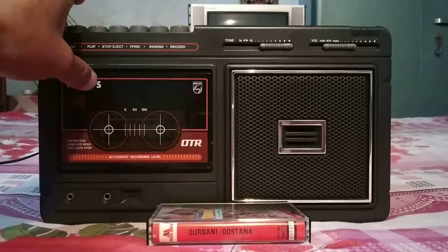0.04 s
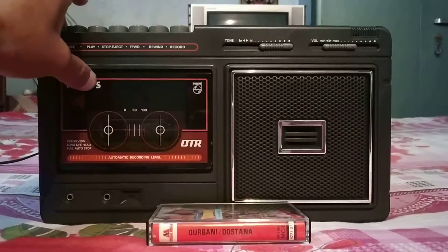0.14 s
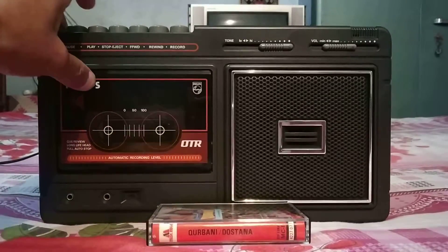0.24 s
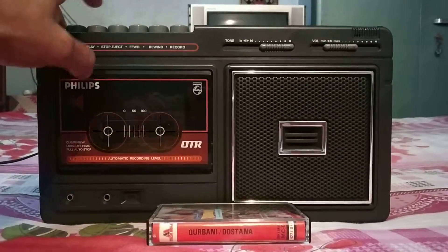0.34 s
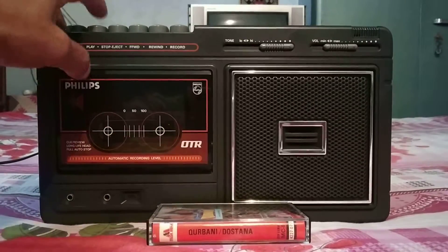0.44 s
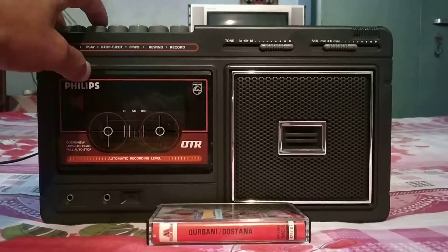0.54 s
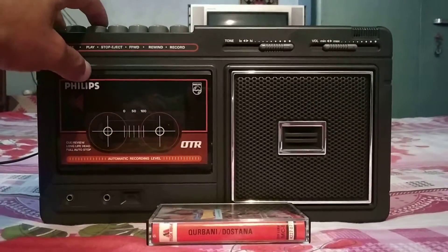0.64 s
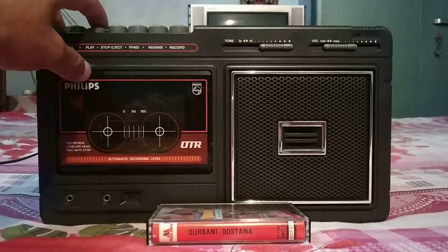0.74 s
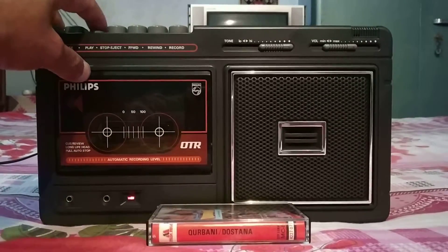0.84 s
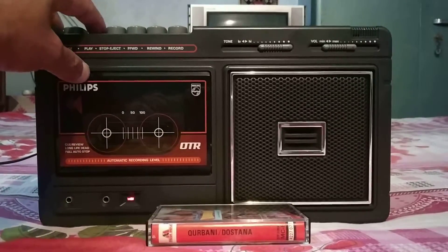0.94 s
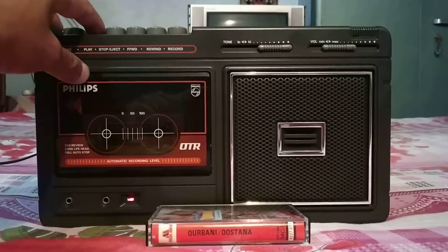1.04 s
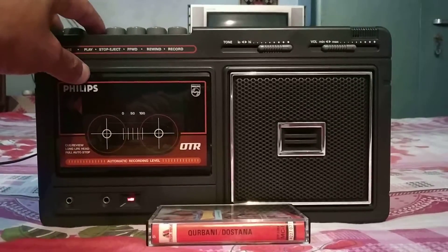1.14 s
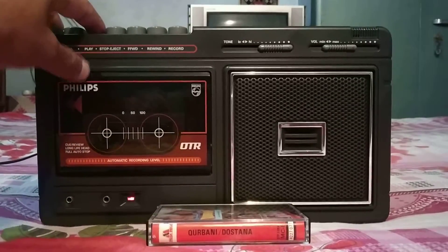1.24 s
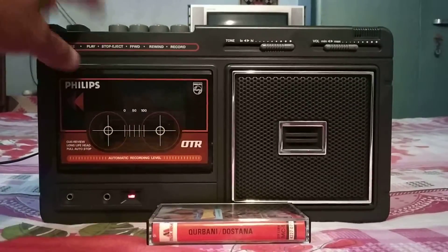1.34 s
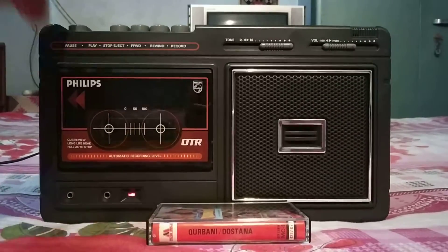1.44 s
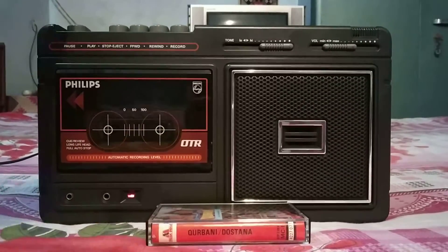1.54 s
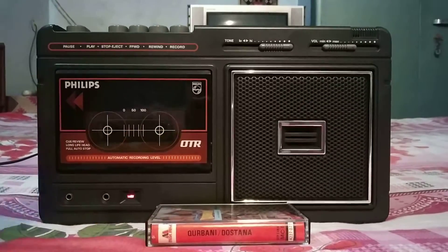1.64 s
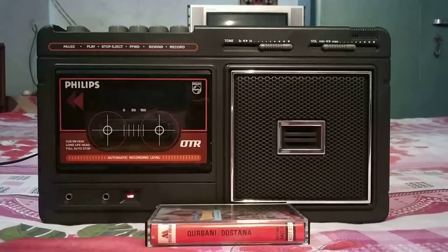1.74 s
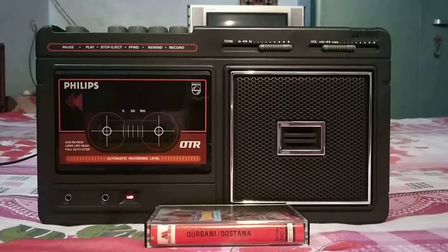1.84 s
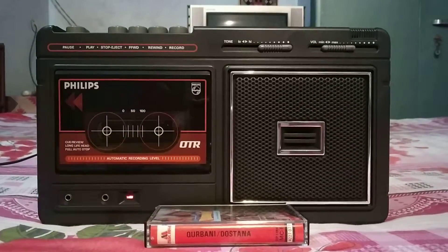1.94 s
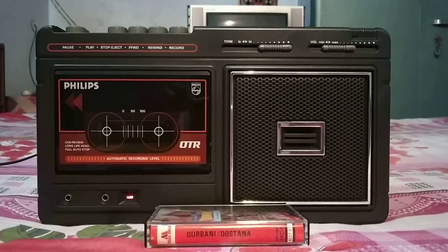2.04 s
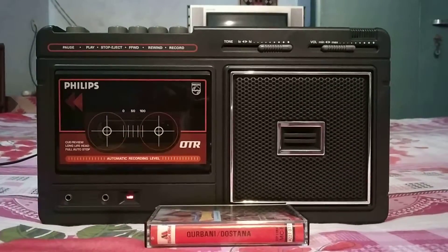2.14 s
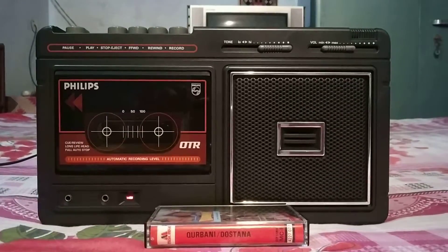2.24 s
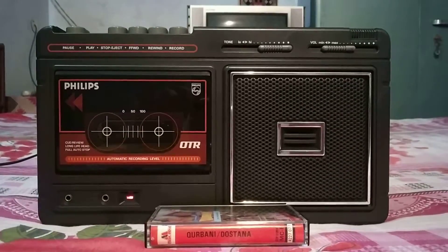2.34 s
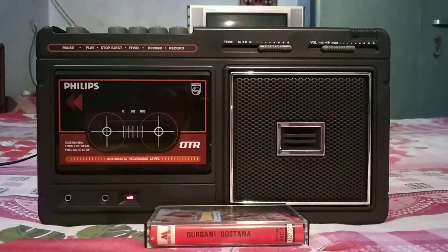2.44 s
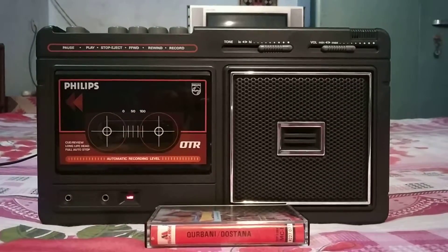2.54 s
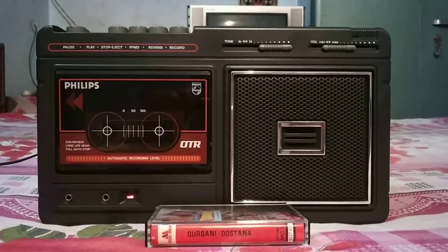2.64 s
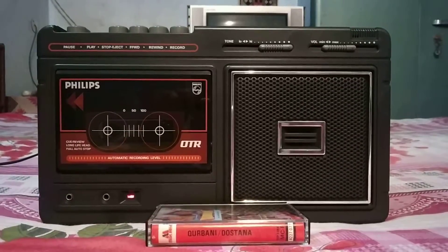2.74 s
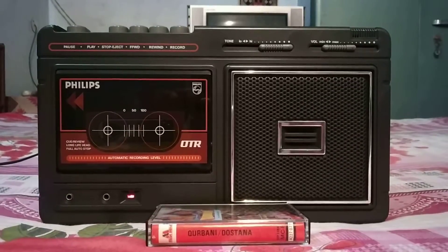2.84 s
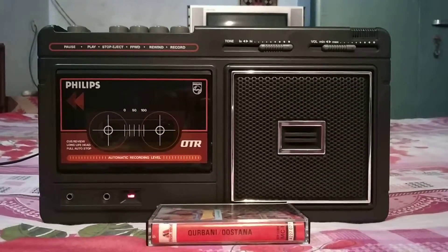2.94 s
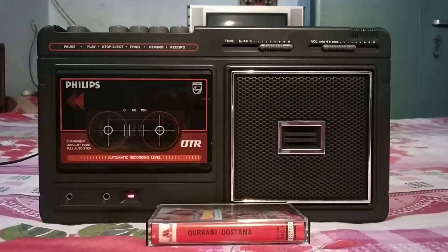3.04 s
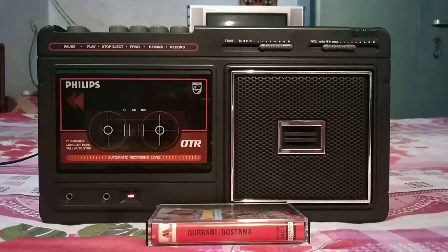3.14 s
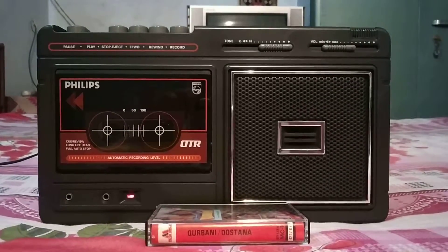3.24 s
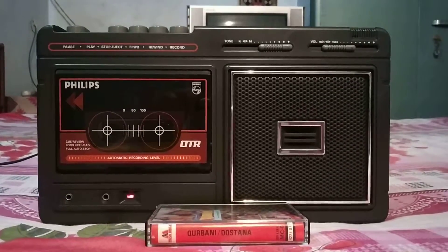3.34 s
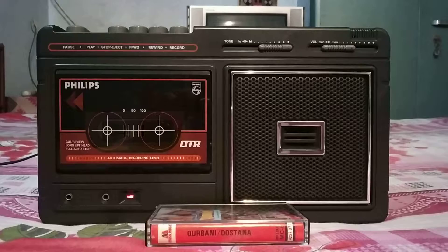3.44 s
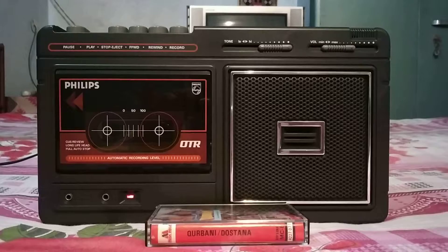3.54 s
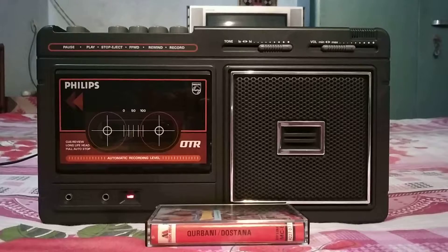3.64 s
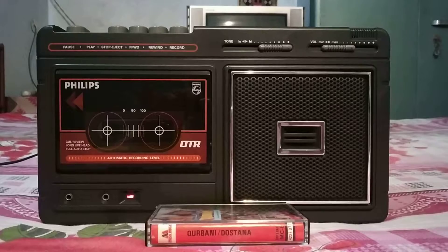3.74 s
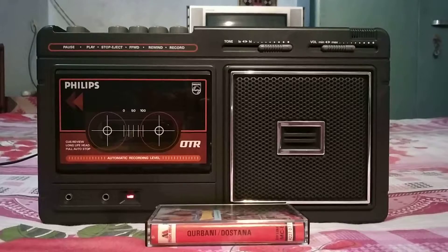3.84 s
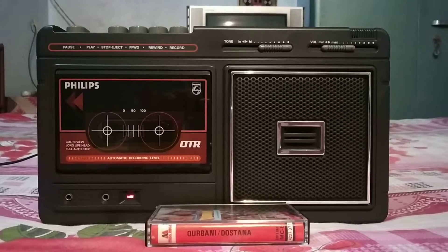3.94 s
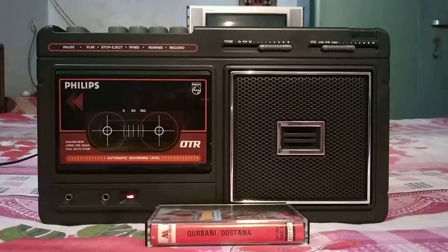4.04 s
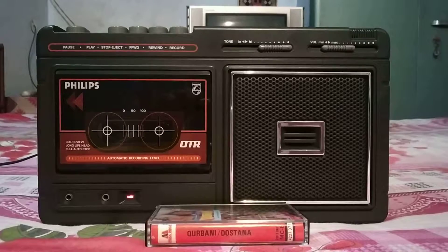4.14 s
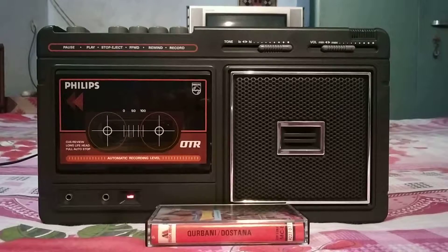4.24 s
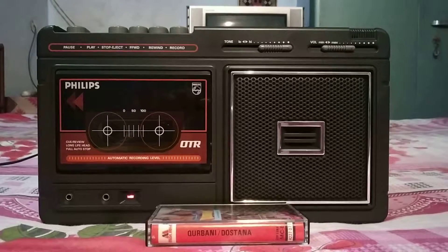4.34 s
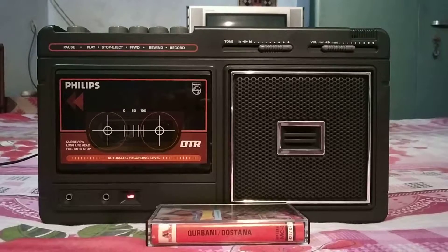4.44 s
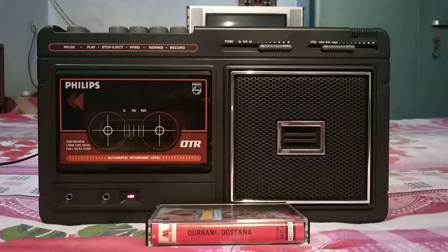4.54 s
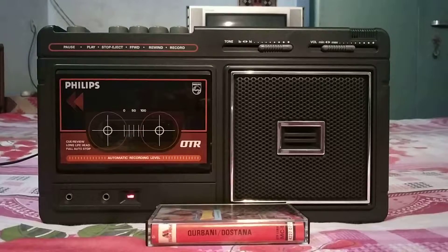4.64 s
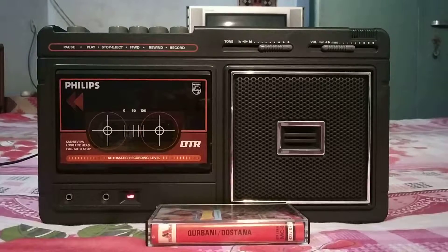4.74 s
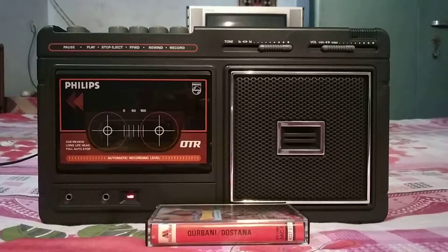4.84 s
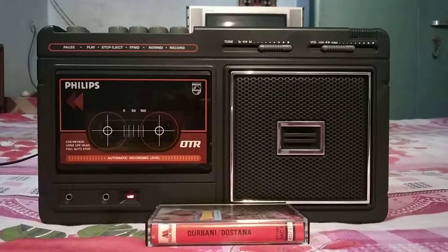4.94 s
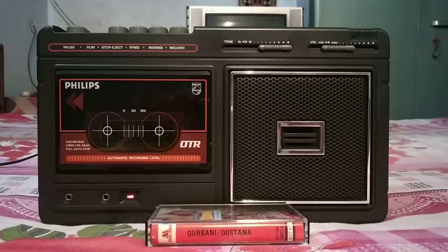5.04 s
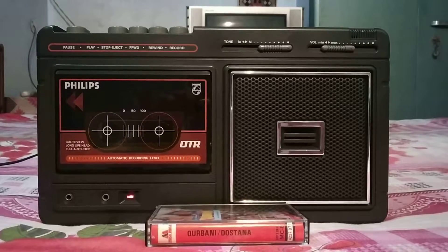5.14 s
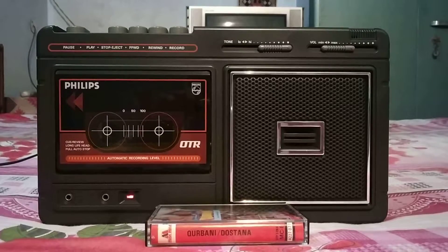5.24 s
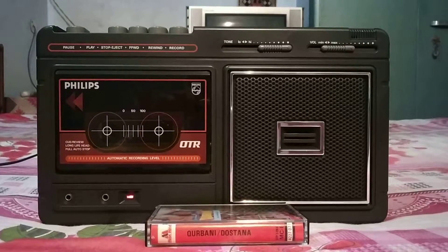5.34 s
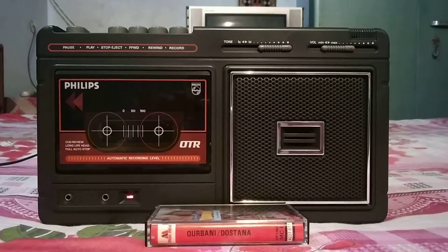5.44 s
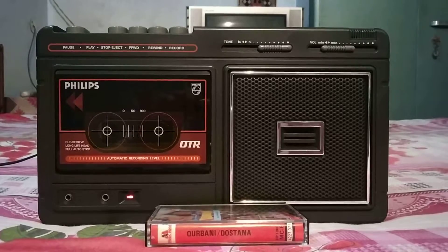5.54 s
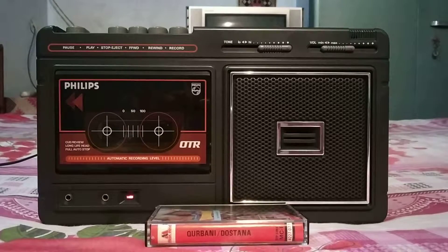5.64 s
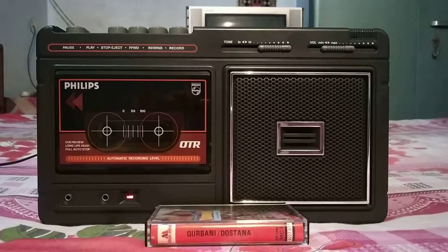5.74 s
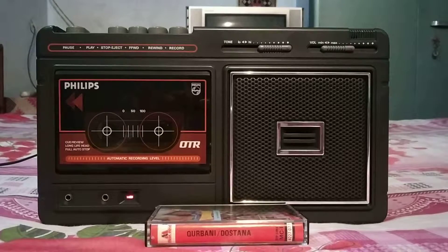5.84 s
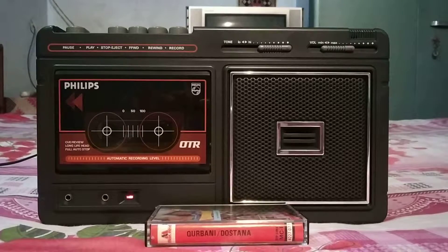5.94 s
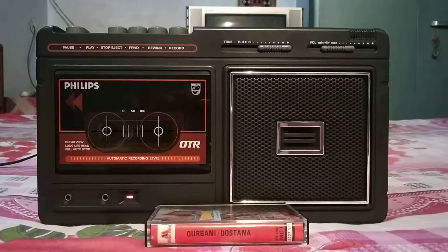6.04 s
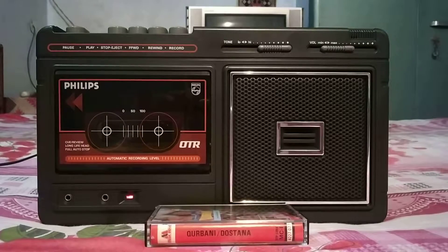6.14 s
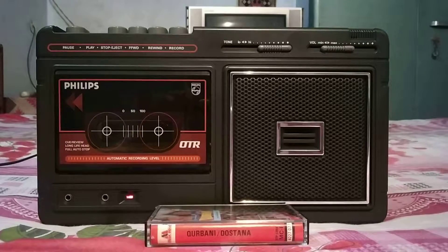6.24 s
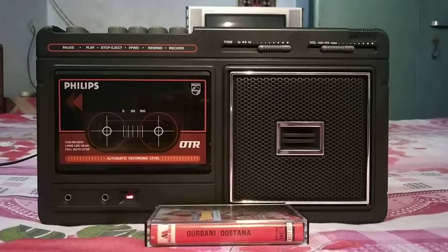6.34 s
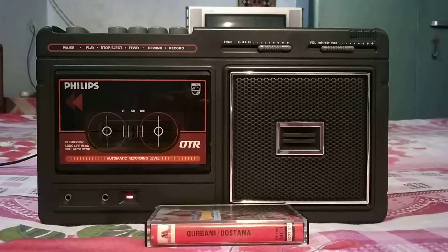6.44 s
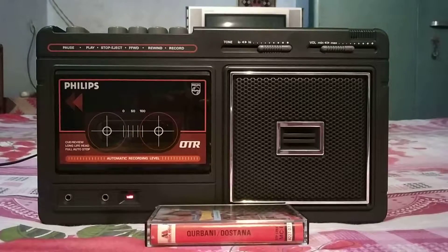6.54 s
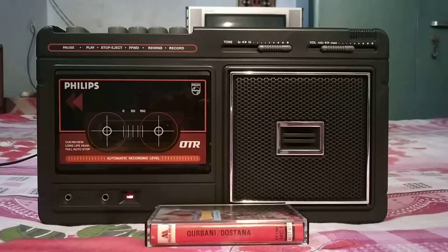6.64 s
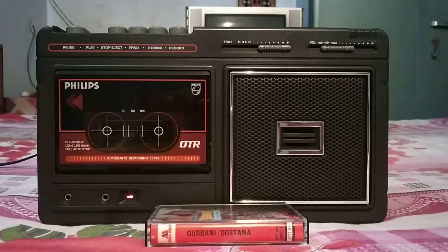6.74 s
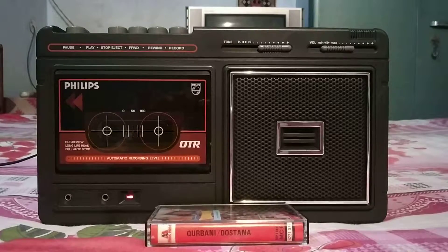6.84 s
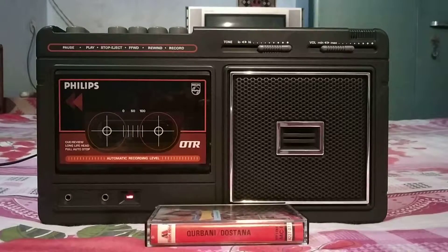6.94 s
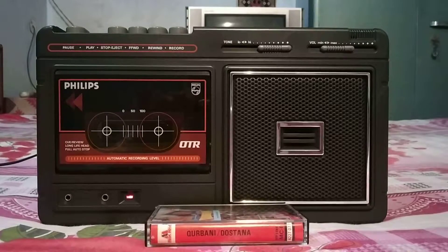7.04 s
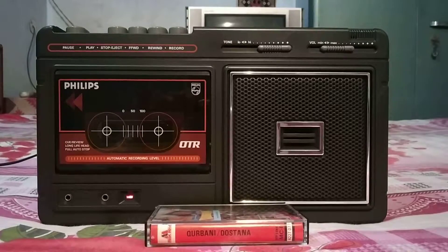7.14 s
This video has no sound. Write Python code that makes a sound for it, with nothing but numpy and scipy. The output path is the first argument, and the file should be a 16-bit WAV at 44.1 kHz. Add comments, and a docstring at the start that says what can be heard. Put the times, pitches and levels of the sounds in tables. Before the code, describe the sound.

A tape machine is clacked shut and its key snapped down; a small motor runs on quietly with hum, a cloth rustle, tiny crackles and high whine.

```python
"""Tape player in a small room

A hand works the door and keys of a plastic tape player close to a microphone with two ports.
Clicks and pushes ring cabinet modes and small latch parts; the motor starts and runs on as tones and noise.
The tail of an earlier click dies away; nearby cloth swishes and crackles as shaped noise.
An appliance hums, faint tones swell and fade, under room noise and microphone hiss; a far clock ticks softly.
A mains-fed whine of two rippled tones comes on briefly, then again to the end."""
import sys
import numpy as np
from scipy import signal
from scipy.fft import rfft, irfft
from scipy.io import wavfile

SR = 44100
rng = np.random.default_rng(int(sys.argv[2]) if len(sys.argv) > 2 else 0)


def voltage_ratio(level):
    """Linear amplitude factor for a level in decibels (scalar or array-like)."""
    return 10 ** (np.asarray(level, float) / 20)


def output_pcm(signal):
    """Save a mono or channel-first signal as 16-bit PCM at the path in sys.argv[1].

    Samples are clipped to [-1, 1] before scaling.
    """
    pcm = np.clip(np.atleast_2d(signal).T, -1, 1) * 32767
    wavfile.write(sys.argv[1], SR, np.round(pcm).astype(np.int16))


N = 317079
BODY_LAG = 5   # samples by which the left port hears the hum and the cabinet later


def rms_one(x):
    """Scale to rms 1."""
    return x / np.sqrt(np.mean(x ** 2) + 1e-20)


def at_hz(points, hz):
    """Read a spectrum table on a log frequency axis."""
    points = np.array(points)
    return np.interp(np.log(hz), np.log(points[:, 0]), points[:, 1])


def drift(rate):
    """Slow random wandering of spread 1; a higher rate wanders faster."""
    r = np.exp(-128 * np.pi * rate / SR)   # computed on every 64th sample
    white = rng.standard_normal(N // 64 + 2002)
    slow = signal.lfilter([1], [1, -2 * r, r * r], white)[2000:]
    return np.interp(np.arange(N) / 64, np.arange(len(slow)), slow / slow.std())


def band(x, low_hz, high_hz, order=1):
    """Butterworth band-pass."""
    edges = np.clip([low_hz, high_hz], 20, 0.45 * SR)
    return signal.sosfilt(signal.butter(order, edges, "band", fs=SR, output="sos"), x)


def pan(x, db, lag=0):
    """Level split of db, left over right; the left port hears it lag samples later."""
    return np.array([np.roll(x, lag) * voltage_ratio(db / 2), x * voltage_ratio(-db / 2)])


def held(start_s, db, held_s, fall_db_per_s, rise_db_per_s):
    """Gain that rises to a level, holds it and fades, straight in dB."""
    since = np.arange(N) / SR - start_s
    rise = rise_db_per_s * np.minimum(since, 0)
    fall = fall_db_per_s * np.maximum(since - held_s, 0)
    return voltage_ratio(db + rise - fall)


# how alike diffuse noise is at the two ports: (frequency [Hz], likeness [0 to 1])
PORT_LIKENESS = [(60, 0.86), (150, 0.76), (380, 0.91), (950, 0.057), (2380, 0.058), (5980, 0.15),
                 (15000, 0.055)]


def coloured(white, spectrum):
    """Stereo noise of rms 1, alike at the ports in the bass and nearly unrelated in the treble."""
    length = white.shape[1]
    hz = np.maximum(np.fft.rfftfreq(length, 1 / SR), 1)
    alike = np.clip(at_hz(PORT_LIKENESS, hz), 0, 1)
    mid, side = rfft(white) * voltage_ratio(at_hz(spectrum, hz))
    ports = np.sqrt(1 + alike) * mid + np.sqrt(1 - alike) * side * [[1], [-1]]
    return rms_one(irfft(ports, length))


def burst(centre_hz, length_ms, alike=0.43):
    """A dying noise, about three octaves wide, partly its own at each port; its shared part peaks at 1."""
    t = np.arange(2000) / SR
    dying = rng.standard_normal((2, len(t))) * np.exp(-t * 1000 / length_ms)
    mid, side = band(dying, centre_hz / 4.0, centre_hz * 2.1)
    return (mid + (1 - alike) * side * [[1], [-1]]) / np.abs(mid).max()


# tones of the humming appliance: (frequency [Hz], relative level [dB], spread of its swelling [dB])
HUM_TONES = [(195.2, -58.5, 0.5), (314.3, -64, 2.5), (336.4, -47.5, 0.57), (347.6, -69.5, 8),
             (397.4, -77.5, 8.5), (470, -71, 5), (1373, -78, 0), (1477, -76, 1)]
# spectrum of room noise and microphone hiss: (frequency [Hz], relative density [dB per Hz])
AIR_SPECTRUM = [(30, -28), (60, 9), (120, -3), (200, 2.5), (300, -8), (450, -13), (650, -16), (1000, -24.5),
                (2000, -23.5), (3200, -30.5), (5500, -25), (8000, -31), (12500, -27.5), (15500, -28)]


def background():
    """The main hum tone is nearly steady; some faint ones swell and fade strongly, over room noise and hiss."""
    t = np.arange(N) / SR
    tones = np.zeros(N)
    for hz, db, swell_db in HUM_TONES:
        level = np.sqrt(2) * voltage_ratio(db + swell_db * drift(5.5))
        tones += level * np.sin(2 * np.pi * hz * t + 0.18 * swell_db * drift(3.6))
    air = voltage_ratio(-48 + 0.32 * drift(21.0)) * coloured(rng.standard_normal((2, N)), AIR_SPECTRUM)
    return pan(tones, 2.2, lag=BODY_LAG) + air * voltage_ratio([[1.3], [-1.3]])


# noise swells: the dying tail of an earlier click, then a stroke of cloth:
# (full from [s], relative level [dB], held [s], fading [dB per s])
NOISE_SWELLS = [(0.0, -41.5, 0.0027, 249), (2.056, -41, 0.18, 28)]
# spectrum of both swells: (frequency [Hz], relative density [dB per Hz])
SWELL_SPECTRUM = [(180, -4), (300, -2.5), (337, -32), (366, -13.5), (404, -10.5), (446, -12), (835, -16),
                  (1180, -17.5), (1810, -22), (3600, -26.5), (5500, -21.5), (8500, -25), (15500, -25.5)]
# a hollow note sliding down inside the swish: (time [s], frequency [Hz], relative level [dB])
HOLLOW_SLIDE = [(2.03, 500, -70), (2.05, 478, -48), (2.08, 444, -60), (2.11, 397, -44), (2.145, 318.7, -56),
                (2.185, 255, -37), (2.22, 201, -34), (2.26, 176, -40), (2.33, 126.4, -70)]


def tail_and_swish(grain_db=1.5, rise_db_per_s=420):
    """A click's tail dies away; later cloth catches in dense uneven grains as a hollow note slides down."""
    grains = rng.standard_normal((2, N)) * voltage_ratio(grain_db * rng.exponential(1, N))
    swells = sum(held(*swell, rise_db_per_s) for swell in NOISE_SWELLS)
    noise = swells * voltage_ratio(1.13 * drift(20)) * coloured(grains, SWELL_SPECTRUM)
    t = np.arange(N) / SR
    s, hz, db = np.transpose(HOLLOW_SLIDE)
    pitch = np.interp(t, s, hz) * (1 + 0.0292 * drift(35.6))
    level = voltage_ratio(np.interp(t, s, db, left=-np.inf, right=-np.inf) + 2.3 * drift(35))
    note = np.sqrt(2) * level * np.sin(2 * np.pi * np.cumsum(pitch) / SR)
    return noise * voltage_ratio([[-3.0], [3.0]]) + pan(note, -5.6)


# hard contacts of door, latch and keys:
# (time [s], relative level [dB], nominal centre [Hz], decay constant before filtering [ms])
HARD_CLICKS = [(0.2439, -31, 8000, 2.4), (0.257, -22.5, 7400, 4.3), (0.3223, -32.5, 5200, 0.58),
               (0.690, -42.5, 2000, 11), (0.7808, -35, 4870, 1.7), (0.7907, -40, 4000, 1.3),
               (0.8759, -24.5, 5530, 1.6), (0.885, -37, 5000, 5.8), (0.9828, -46.5, 5970, 30),
               (1.0067, -30, 5950, 2.4), (1.0108, -9.5, 8960, 9), (1.0138, -12, 6000, 4.3),
               (1.2345, -30, 6100, 4.8), (1.2408, -32.5, 4000, 3.5)]
# soft pushes on the cabinet: (time [s], relative level [dB], tilt over the modes [dB per octave])
SOFT_KNOCKS = [(0.2446, -35, -8), (0.257, -28.5, 4), (.2640, -21.5, 6), (0.691, -34, 1),
               (0.7893, -13.5, -7), (1.0138, -24.5, 21.5), (1.0190, -33.5, -9), (1.2356, -33, 2),
               (1.2413, -27.5, 5.5), (1.2480, -29, 6)]
# ringing modes of the cabinet: (frequency [Hz], relative level [dB], t60 [s])
CABINET_MODES = [(233.6, -13, 0.23), (255, -17, 0.097), (329, -1.5, 0.02), (448, -11, 0.16),
                 (500, -10.5, 0.14), (712, -24.5, 0.061), (956, -10, 0.0083), (1280, -25, 0.031),
                 (1564, -28, 0.025), (1650, -40, 0.049)]
# the whole front flexes once: (frequency [Hz], relative level [dB], t60 [s])
FRONT_FLEX = (530, 0.0, 0.015)
# small hard parts of latch and keys, rung by every click: (frequency [Hz], relative level [dB], t60 [s])
LATCH_PARTS = [(1300, -30.5, .012), (4540, -47, .012), (4760, -44, 0.0058), (5200, -40, .012),
               (5600, -30.5, 0.011), (7400, -49, 0.0099), (8550, -32, 0.017), (9120, -26, .01),
               (10930, -25, 0.0047), (13900, -24, 0.0054)]


def player(knock_ms=0.48, bare_db=-1.0, side_db=3.5):
    """Hard clicks sound in the air and rattle the cabinet; soft pushes set it ringing."""
    port_lag = 8   # samples by which the left port hears a click later
    rattle_db, rattle_tilt_db = -18, 8   # how a click shakes the cabinet: level, tilt per octave
    t = np.arange(SR // 2) / SR
    short_t = t[:2000]
    push = signal.windows.hann(round(knock_ms * SR / 1000) + 2)
    modes = [-voltage_ratio(db) * np.sin(2 * np.pi * hz * t) * voltage_ratio(-60 * t / t60)
             for hz, db, t60 in [*CABINET_MODES, FRONT_FLEX]]
    # a negative tilt favours the low modes and the flex, which is placed at -1.2 octaves
    octaves = np.append(np.log2(np.array(CABINET_MODES)[:, 0] / 500), -1.2)
    small_box = signal.butter(4, 165, "high", fs=SR, output="sos")   # a small box radiates no deep bass
    clicks, knocks = np.zeros((2, 2, N))
    drives = [(s, voltage_ratio(db) * push / push.sum(), tilt_db) for s, db, tilt_db in SOFT_KNOCKS]
    for s, db, centre_hz, ms in HARD_CLICKS:
        at = round(s * SR)
        contact = voltage_ratio(db) * burst(centre_hz, ms) * voltage_ratio([[side_db / 2], [-side_db / 2]])
        parts = np.zeros((2, len(short_t)))
        for hz, level_db, t60 in LATCH_PARTS:
            level = voltage_ratio(level_db + rng.normal(0, 2.1, (2, 1)))   # uneven from click to click
            parts += level * np.sin(2 * np.pi * hz * short_t) * voltage_ratio(-60 * short_t / t60)
        ringing = signal.fftconvolve(contact, parts, axes=1)[:, :2000]
        click = voltage_ratio(bare_db) * contact + ringing
        drives.append((s, voltage_ratio(rattle_db) * click[0], rattle_tilt_db))
        clicks[0, at + port_lag:at + port_lag + 2000] += click[0]
        clicks[1, at:at + 2000] += click[1]
    for s, drive, tilt_db in drives:
        at = round(s * SR)
        weights = voltage_ratio(tilt_db * octaves + rng.normal(0, 1, len(modes)))
        body = signal.fftconvolve(weights @ modes, drive)
        body = signal.sosfilt(small_box, body)
        knocks[:, at:at + len(body)] += pan(body, side_db, lag=BODY_LAG)
    return clicks, knocks


# small crackles, levels before filtering:
# (time [s], bright level [dB], left over right [dB], dull level [dB])
CRACKLE_TICKS = [(0.3949, -44, 1, -62), (1.4186, -37, 11, -37.5), (2.2413, -34, -14, -36),
                 (2.303, -34, -10, -49), (2.3529, -28, -16, -39), (2.371, -33, -10, -45),
                 (2.412, -28.5, -3.0, -35), (2.4662, -33.5, -15, -38), (2.5227, -35, 7, -45),
                 (2.5595, -34.5, -2.5, -42), (2.6663, -33.5, -16, -51), (2.746, -37, -5, -55),
                 (2.8703, -32, 10, -35), (3.1663, -42, -8, -62), (3.2094, -32, 4, -54),
                 (3.5733, -33, 7, -44), (3.9188, -33.5, 11, -39), (4.431, -32.5, 8, -36)]


def crackles():
    """Single short ticks of nearby cloth: quickly dying noise with a bright and a dull part."""
    out = np.zeros((2, N))
    for s, bright_db, side_db, dull_db in CRACKLE_TICKS:
        at = round(s * SR)
        bright = voltage_ratio(bright_db) * band(burst(11000, 0.73), 6400, 11300)
        dull = voltage_ratio(dull_db) * band(burst(1050, 1.3), 470, 1860, order=2)
        out[:, at:at + 2000] += (bright + dull) * voltage_ratio([[side_db / 2], [-side_db / 2]])
    return out


def clock(first_s=0.502, rise_s=0.015, t60=0.3):
    """A far clock: one tick a second, heard only as a soft swell of reflections."""
    since = (np.arange(N) / SR - first_s) % 1
    shape = np.minimum(since / rise_s, 1) * voltage_ratio(-60 * since / t60)
    return voltage_ratio(-51.5) * shape * rms_one(band(rng.standard_normal((2, N)), 1420, 2230))


# motor tones: (multiple of the turn rate, relative level [dB])
MOTOR_ORDERS = [(4, -70), (7, -65), (10, -67), (12, -72), (13, -70), (14, -76), (15, -68), (16, -73),
                (17, -74), (18, -82), (21, -81), (22, -80), (23, -80), (24, -80), (28, -84), (30, -84),
                (31, -80), (32, -77)]
# spectrum of the bearing noise: (frequency [Hz], relative density [dB per Hz])
BEARING_SPECTRUM = [(200, 0), (450, 2), (700, -10), (900, -7), (1330, -8), (2000, -10.5), (3500, -17.5),
                    (9000, -17), (15500, -21.5)]


def motor(start_s=1.245, run_up_s=0.012, turns_per_s=41.58):
    """Tones on multiples of the turn rate over bearing noise, louder while it gathers speed."""
    surge_db, surge_s = 25, 0.038
    since = np.maximum(np.arange(N) / SR - start_s, 0)
    up = 1 - np.exp(-since / run_up_s)
    level = up ** 2 * voltage_ratio(surge_db * np.exp(-since / surge_s))
    turns = up * turns_per_s * (1 + 0.00086 * drift(1.3))
    angle = 2 * np.pi * np.cumsum(turns) / SR
    tones = np.zeros(N)
    for k, db in MOTOR_ORDERS:
        wavering = np.sqrt(2) * voltage_ratio(db + 2.0 * drift(2.2))
        tones += wavering * np.sin(k * angle + rng.uniform(0, 2 * np.pi))
    noise = voltage_ratio(-57 + 1.9 * drift(2.1)) * coloured(rng.standard_normal((2, N)), BEARING_SPECTRUM)
    return level * (pan(tones, 5.4) + noise * voltage_ratio([[1.5], [-1.5]]))


# when the whine is on: (from [s], for [s], relative level [dB])
WHINE_TIMES = [(1.26, 0.195, 1), (3.32, 4.0, 1.36)]
# the two close tones: (lower [Hz], upper [Hz])
WHINE_TONES = (6535.3, 6552.7)
# mains-ripple sidebands:
# (ripple multiple, relative level on the lower tone [dB], relative level on the upper tone [dB])
RIPPLE_SIDEBANDS = [(-4, -88, -86), (-3, -76, -87), (-2, -79, -84), (-1, -68, -70), (0, -66, -72),
                    (1, -84, -83), (2, -82, -85), (3, -83, -93)]
# resonances that the ripple pulses ring: (frequency [Hz], width [Hz], relative level [dB])
BUZZ_RESONANCES = [(4800, 300, -7), (5150, 300, -7), (5480, 120, 0), (5750, 120, 3), (6130, 150, -3)]
# spectrum of the hiss under the whine: (frequency [Hz], relative density [dB per Hz])
HISS_SPECTRUM = [(3000, -10), (4200, -4), (5000, -0.5), (5500, 2), (6000, -5), (6800, -1), (7000, -33),
                 (9000, -43)]


def whine(hiss_db=-62, side_db=10.0, buzz_db=-53, tones_db=-1.8, ripple_hz=100.1):
    """Mains ripple sways two close tones in opposite senses; pulses near its rate buzz as a hiss sways."""
    t = np.arange(N) / SR
    tones = np.zeros(N)
    for k, *levels in RIPPLE_SIDEBANDS:
        start = rng.random()
        for upper, (hz, db) in enumerate(zip(WHINE_TONES, levels)):
            level = np.sqrt(2) * voltage_ratio(db + tones_db + drift(3.7))
            # half a cycle on the upper tone's odd sidebands opposes its sway
            cycles = (hz + k * ripple_hz) * t + start + upper * k / 2
            tones += level * np.sin(2 * np.pi * cycles)
    cycle = 99.95 * t + 0.003 * drift(3)   # slightly unsteady, so the high lines are blurred
    pulses = rms_one(np.diff(np.floor(cycle), prepend=0))
    buzz = sum(voltage_ratio(db + buzz_db) * band(pulses, hz - width / 2, hz + width / 2, order=2)
               for hz, width, db in BUZZ_RESONANCES)
    sway = 1 + 0.095 * np.cos(2 * np.pi * cycle)
    hiss = voltage_ratio(hiss_db) * coloured(rng.standard_normal((2, N)) * sway, HISS_SPECTRUM)
    on = sum(held(s, db, for_s, fall_db_per_s=300, rise_db_per_s=1200) for s, for_s, db in WHINE_TIMES)
    # the left port hears the tones a sample earlier
    return on * (pan(tones + buzz, side_db, lag=-1) + hiss * voltage_ratio([[2.5], [-2.5]]))


# reflections of the small room: (frequency [Hz], relative level [dB], t60 [s])
ROOM_TAIL = [(180, 1, 0.88), (367, 5.5, 0.41), (670, -1, 0.46), (1450, 5, 0.36), (4000, -5.5, 0.38),
             (12000, -5.5, 0.23)]


def room(x, build_s=0.0098):
    """Diffuse reflections: the energy of each half octave builds up and dies away as fresh noise."""
    out = np.zeros((2, N))
    build = np.exp(-1 / (build_s * SR))
    # neighbouring bands take turns between two noises
    white = [coloured(rng.standard_normal((2, N)), [(100, 0), (10000, 0)]) for turn in range(2)]
    for k, hz in enumerate(150 * 2 ** np.arange(0, 7, 0.5)):
        low, high = hz / 2 ** 0.25, hz * 2 ** 0.25
        t60 = at_hz(np.array(ROOM_TAIL)[:, ::2], hz)
        keep = voltage_ratio(-120 / (t60 * SR))   # energy kept from sample to sample
        energy = band(x.mean(axis=0) + 1e-9, low, high, order=2) ** 2
        energy = signal.lfilter([(1 - keep) * (1 - build)], np.convolve([1, -keep], [1, -build]), energy)
        noise = rms_one(band(white[k % 2], low, high, order=2))
        out += voltage_ratio(at_hz(ROOM_TAIL, hz)) * np.sqrt(energy) * noise
    return out


def scene():
    """Clicks and crackles get the room's tail, the knocks less of it; the other layers get none added."""
    clicks, knocks = player()
    clicks = clicks + crackles()
    tail = room(clicks + voltage_ratio(-15) * knocks)
    return background() + tail_and_swish() + clicks + knocks + tail + clock() + motor() + whine()


def band_limit(x):
    """A steep low-pass at the top of the band."""
    return signal.sosfilt(signal.butter(12, 16470, fs=SR, output="sos"), x)


def record(dry):
    """A steep low cut that lets a trace of deep bass by, then a steep high cut."""
    low_cut_hz, high_cut_hz = 229, 16100
    cut = signal.sosfilt(signal.butter(4, low_cut_hz, "high", fs=SR, output="sos"), dry)
    cut = cut + voltage_ratio(-44) * band(dry, 20, 60)
    mix = signal.sosfilt(signal.cheby2(14, 50, high_cut_hz, fs=SR, output="sos"), cut)
    return band_limit(mix)


dry = scene()
out = record(dry)
output_pcm(out)
```